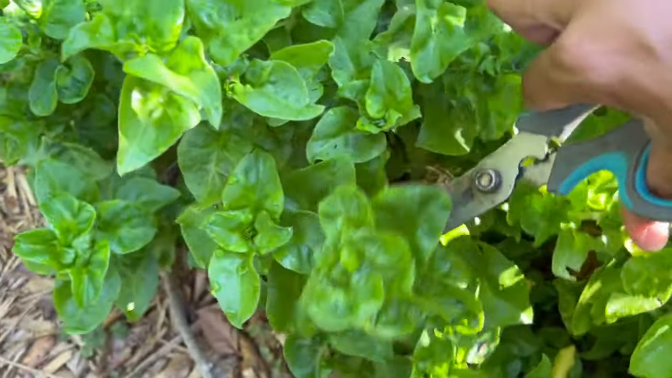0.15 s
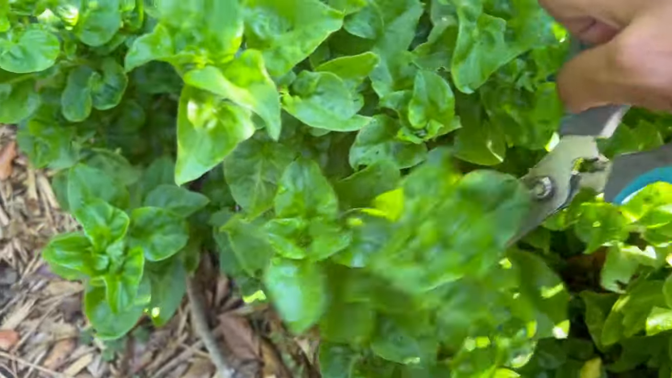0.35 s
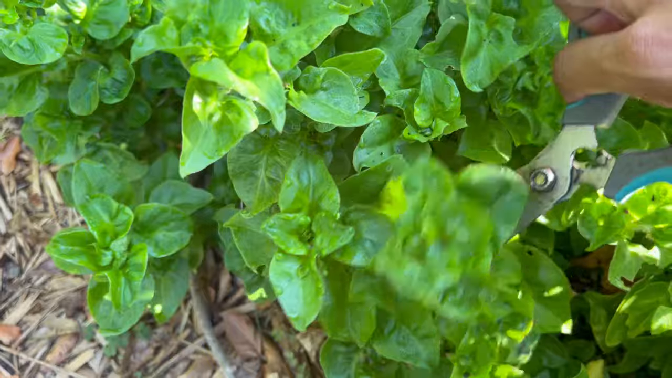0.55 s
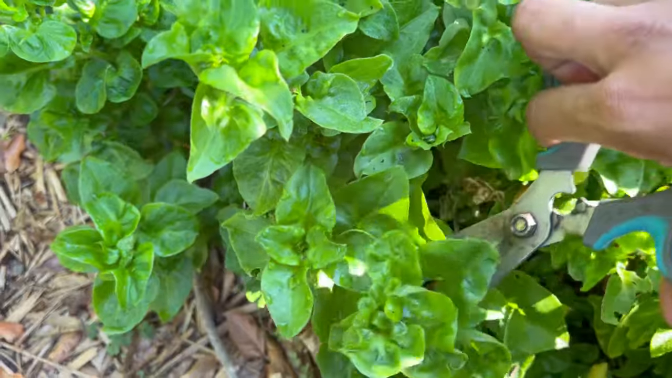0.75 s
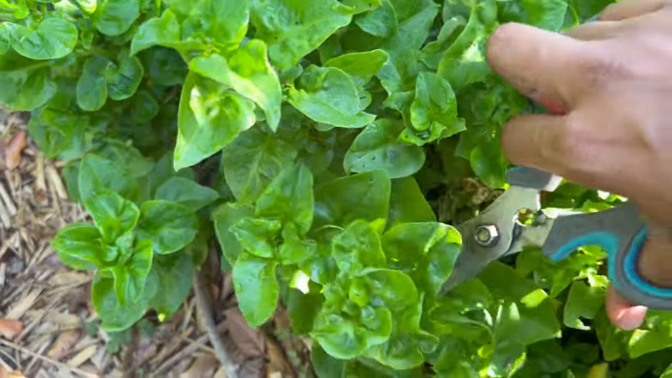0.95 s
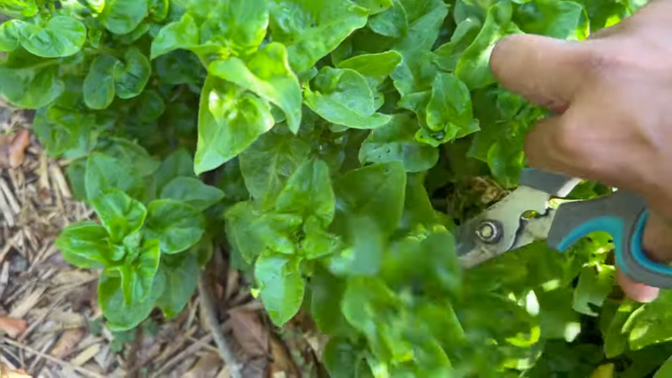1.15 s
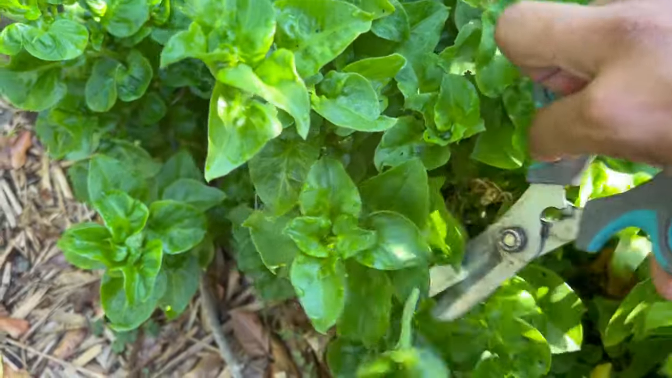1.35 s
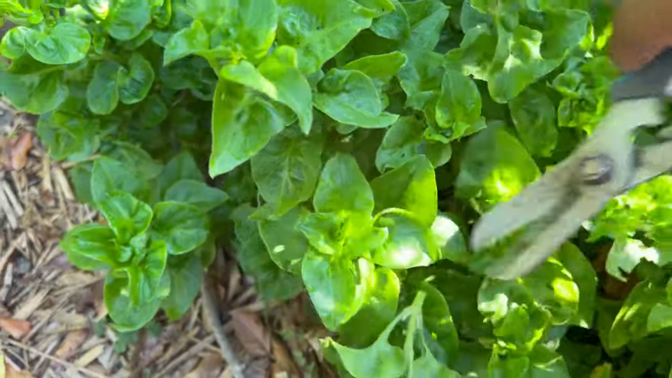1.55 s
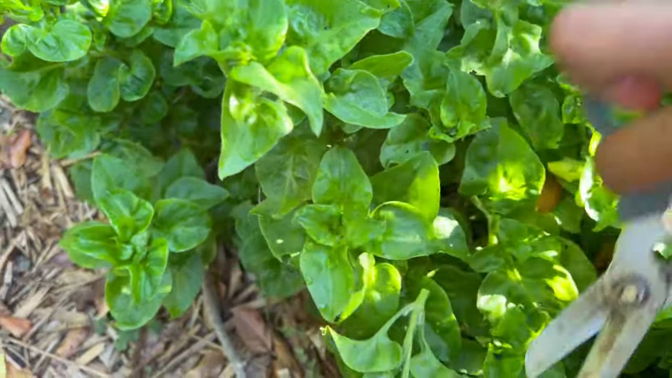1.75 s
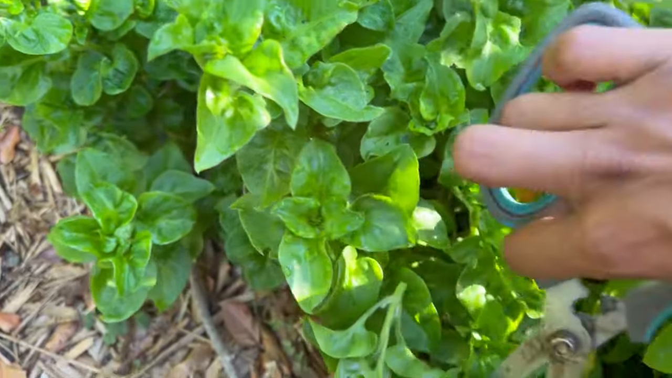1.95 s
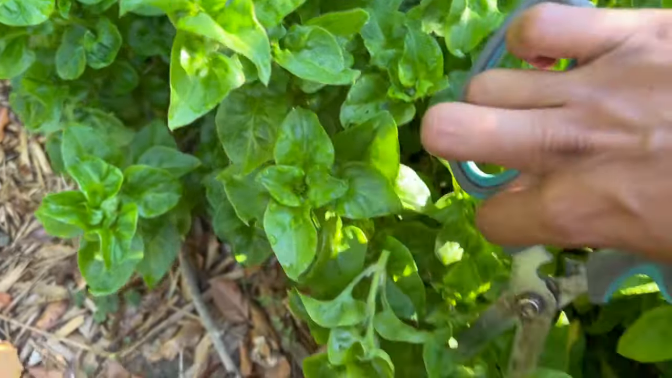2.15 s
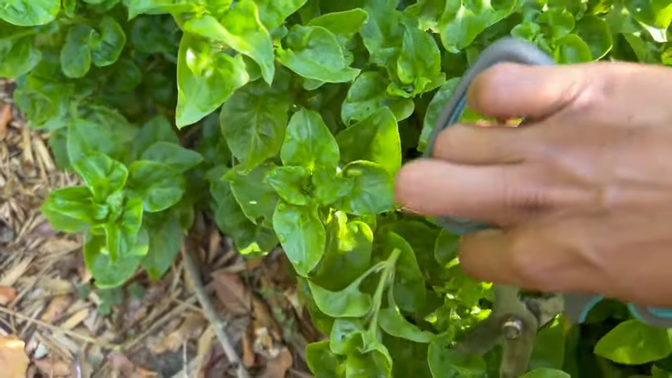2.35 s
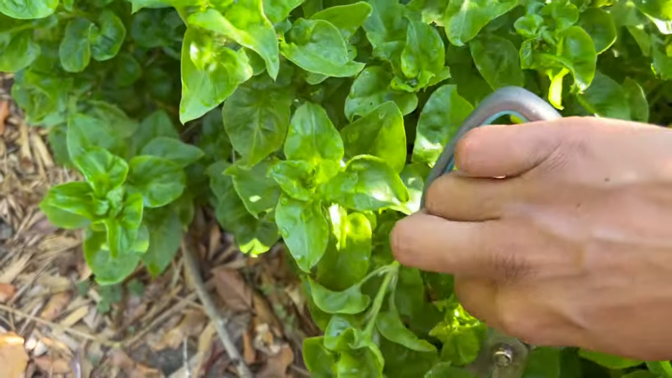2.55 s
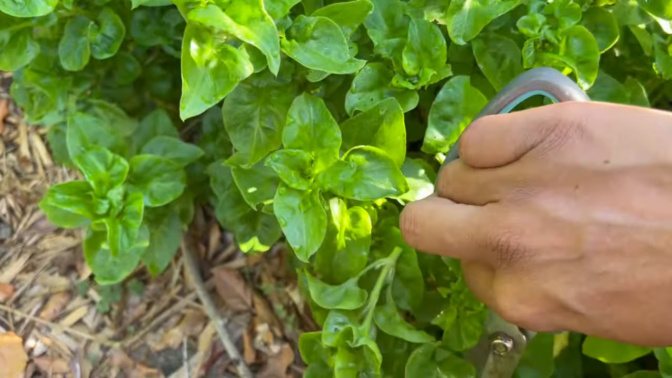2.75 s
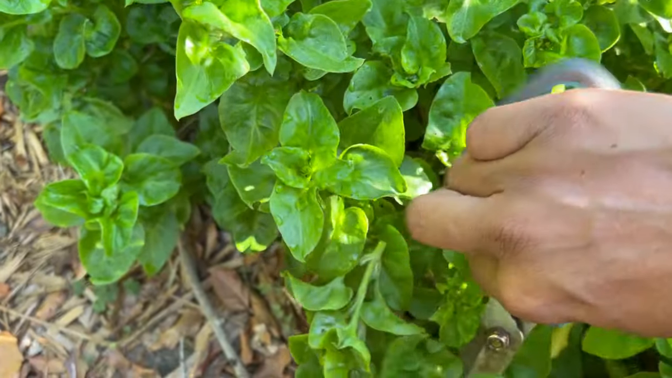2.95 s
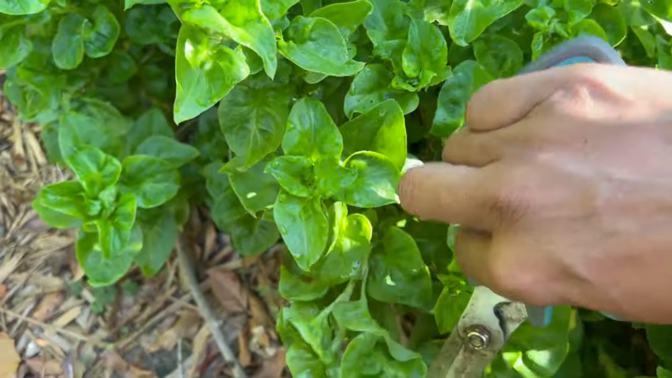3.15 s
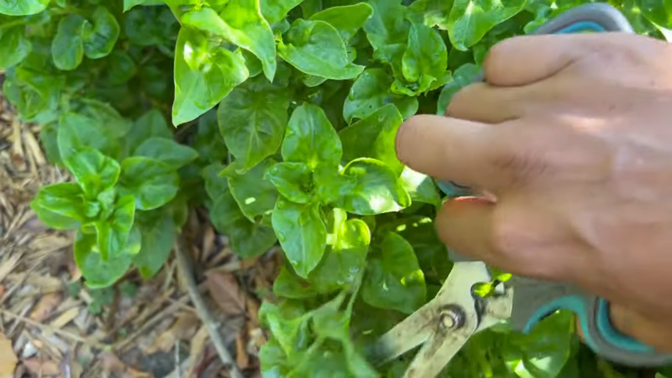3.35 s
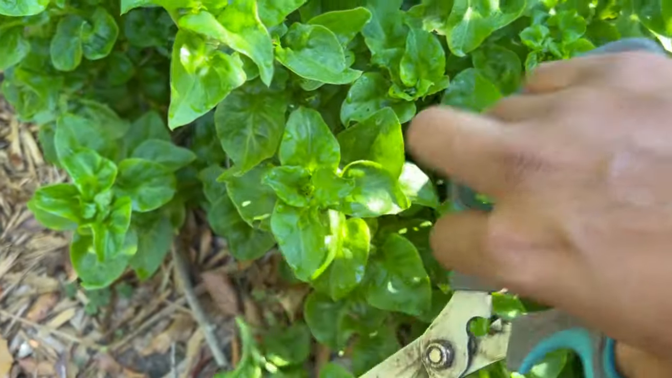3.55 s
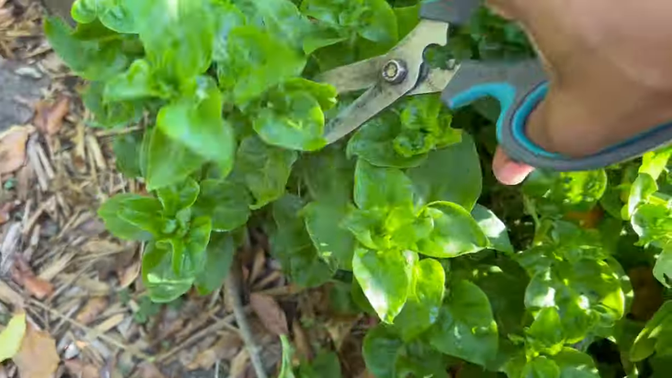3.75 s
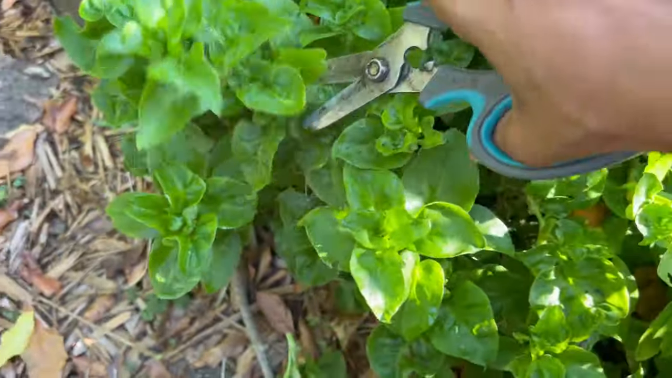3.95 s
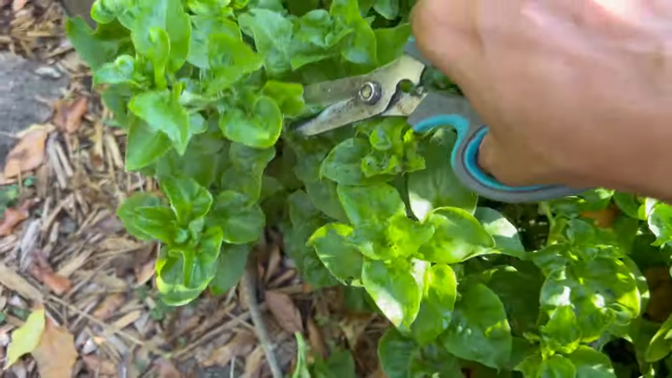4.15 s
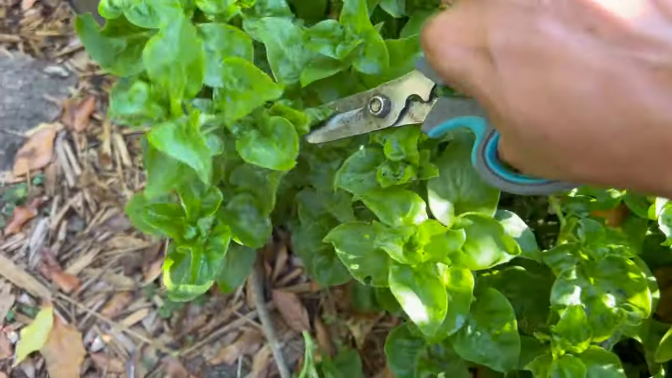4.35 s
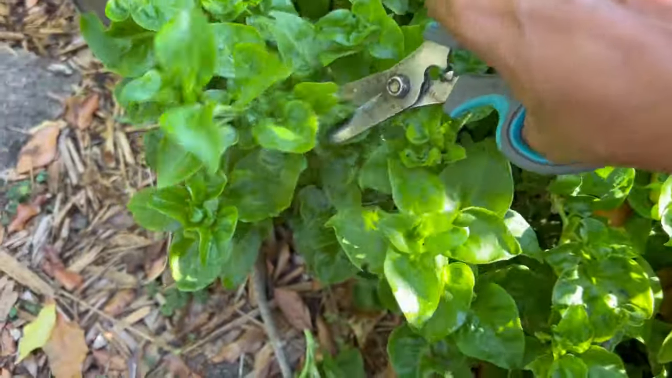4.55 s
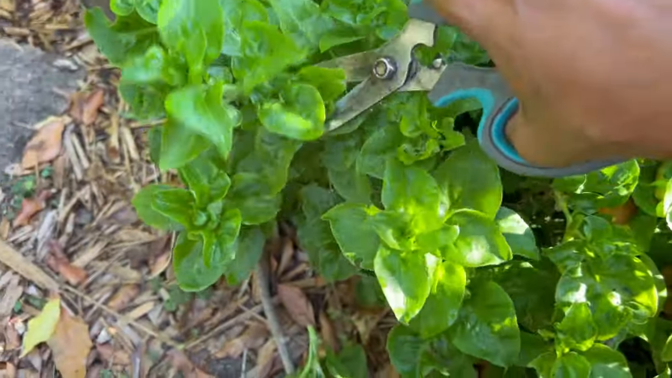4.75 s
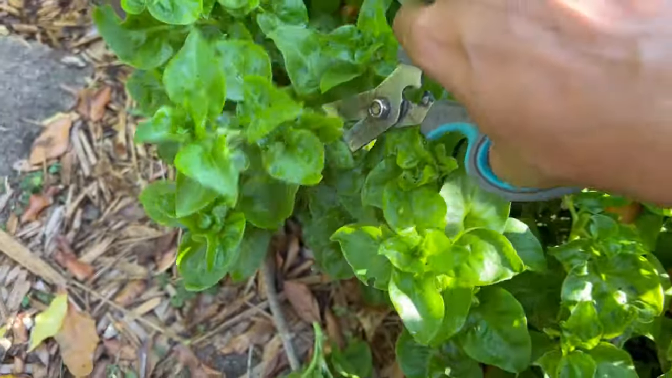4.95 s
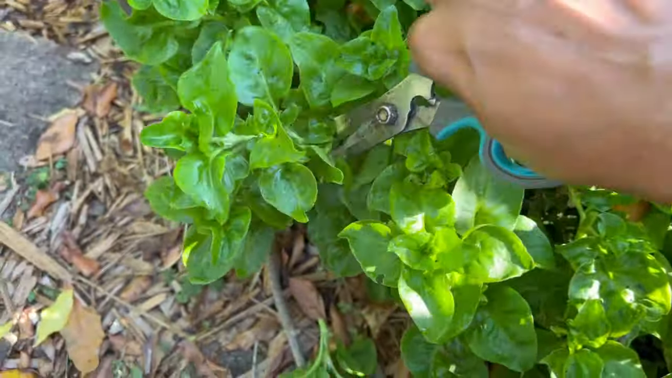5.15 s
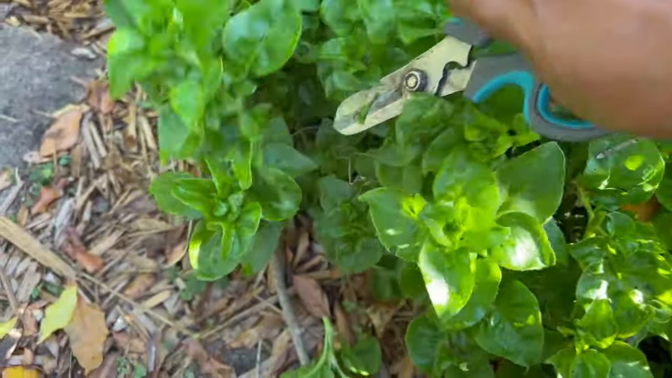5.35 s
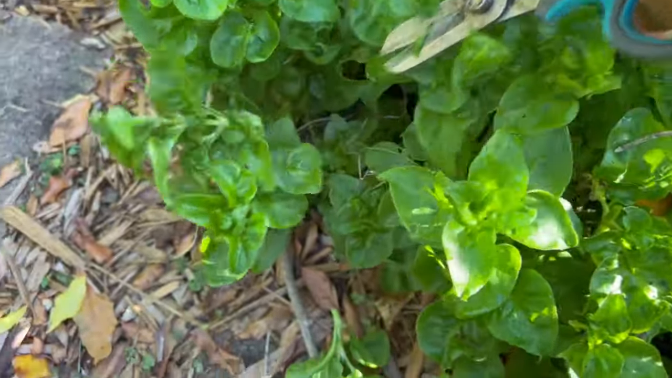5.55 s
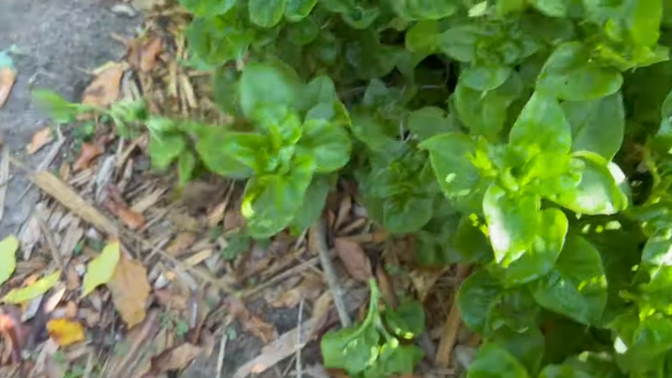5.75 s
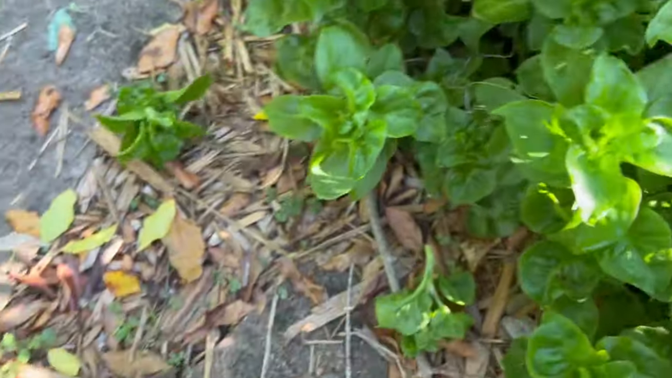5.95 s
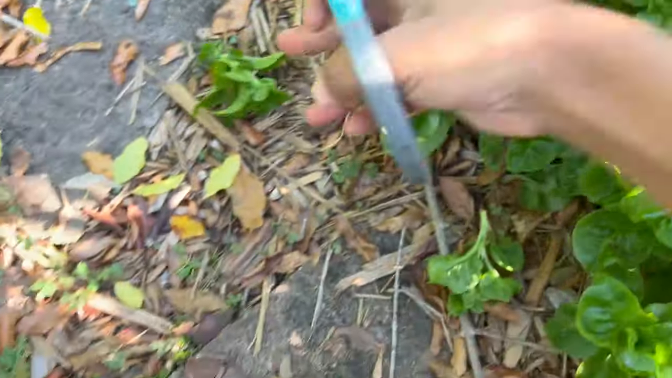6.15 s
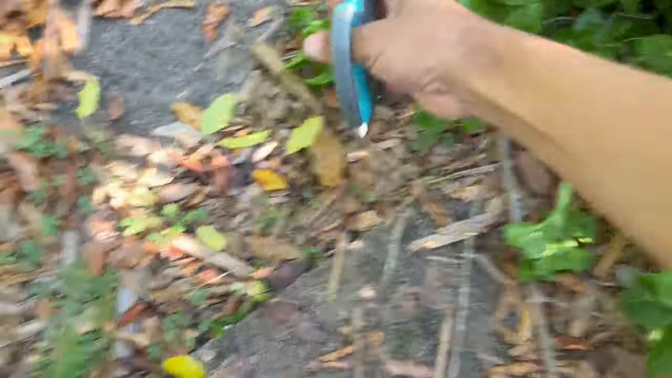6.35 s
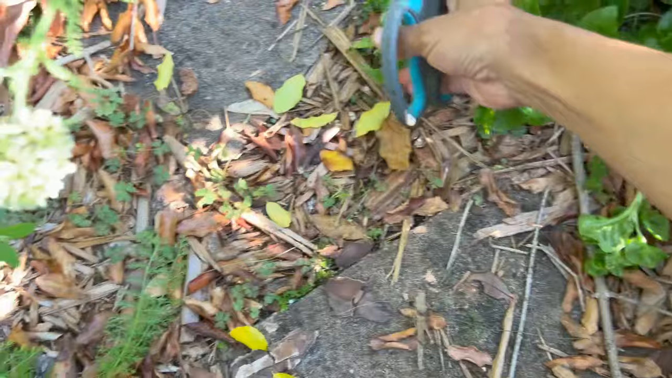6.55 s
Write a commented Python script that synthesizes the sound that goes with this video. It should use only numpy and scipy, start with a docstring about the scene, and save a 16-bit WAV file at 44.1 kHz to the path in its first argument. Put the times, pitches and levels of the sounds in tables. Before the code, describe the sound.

Crisp, close snips of garden shears cut juicy stems amid brushing leaves, over a low rumble, faint insects and a small chirping bird.

```python
"""Hand shears in a garden

Shears snip juicy stems close to a two-port microphone: fibres tear in noise bursts that ring the blades, hard
cuts snap them shut, and leaves rustle. Behind lie a low rumble, an insect chorus, far hiss, a small bird's
echoing chips and faint far tones. One chip and its echoes stop abruptly just as a low click sounds; two soft
bumps come late. The loudest snips clip and make the gain control duck the background."""
import sys
import numpy as np
from scipy import signal
from scipy.fft import rfft, irfft, next_fast_len
from scipy.io import wavfile
from scipy.ndimage import uniform_filter1d, map_coordinates

SR = 44100
rng = np.random.default_rng(int(sys.argv[2]) if len(sys.argv) > 2 else 0)


def inscribe(sig):
    """Save sig as 16-bit PCM at rate SR to the path in sys.argv[1].

    A 1-D sig is mono; a 2-D sig holds one channel per row.
    Samples are clipped to [-1, 1] before scaling.
    """
    pcm = np.round(np.clip(np.atleast_2d(sig).T, -1, 1) * 32767)
    wavfile.write(sys.argv[1], SR, pcm.astype(np.int16))


N = 291942
TREBLE_LAG, BODY_LAG = 12, 4  # delay between the ports [samples]


def amp(db):
    """Decibels as an amplitude ratio."""
    return 10 ** (np.asarray(db) / 20)


def unit(x):
    """Normalisation to rms 1."""
    return x / np.sqrt(np.mean(x ** 2) + 1e-20)


def along(points, hz):
    """Interpolation of (frequency, value) points on a logarithmic axis."""
    knots_hz, values = np.transpose(points)
    return np.interp(np.log(hz + 1), np.log(knots_hz + 1), values)


def curves(rows):
    """Linear interpolation: one value per sample for each column after the time."""
    times, *columns = np.transpose(rows)
    return [np.interp(np.arange(N) / SR, times, column) for column in columns]


def wobble(rate):
    """Random modulation: a spline through rate Gaussian knots a second."""
    return map_coordinates(rng.standard_normal(int(N * rate / SR) + 4), [np.arange(N) * rate / SR])


def filtered(x, response):
    """Zero-phase filtering by a gain that depends on frequency."""
    size = next_fast_len(N + SR // 2)
    return irfft(rfft(x, size) * response(np.fft.rfftfreq(size, 1 / SR)), size)[..., :N]


def coloured(x, spectrum):
    """Minimum-phase filtering with power gain 1: resonances ring only after their excitation."""
    cepstrum = irfft(np.log(amp(along(spectrum, np.fft.rfftfreq(4096, 1 / SR))) + 1e-5))
    cepstrum[1:2048] *= 2
    cepstrum[2049:] = 0
    impulse = irfft(np.exp(rfft(cepstrum)))
    return signal.fftconvolve(x, impulse[None] / np.linalg.norm(impulse), axes=1)[:, :N]


def diffuse(spectrum):
    """A diffuse noise field of rms 1: the ports are coherent only at long wavelengths."""
    # likeness of left and right: (frequency [Hz], correlation [ratio])
    coherence = [(60, 1), (180, 0.91), (550, 0.16), (1650, 0.23), (4970, 0.039), (15000, 0.03)]

    def mid_side_gain(hz):
        angle = np.arccos(np.clip(along(coherence, hz), -1, 1)) / 2
        return amp(along(spectrum, hz)) * [np.cos(angle), np.sin(angle)]

    mid, side = filtered(rng.standard_normal((2, N)), mid_side_gain)
    return unit(np.array([mid + side, mid - side]))


def near(own, lag):
    """Path difference: noise reaches the right port lag samples early; own is the incoherent share."""
    shared = rng.standard_normal(N + lag)
    coherent = np.array([shared[:N], shared[lag:]])
    return np.sqrt(1 - own) * coherent + np.sqrt(own) * rng.standard_normal((2, N))


def foliage(x, t60, build_s):
    """Scattering: echoes merge into an exponentially decaying noise tail at each port."""
    t = np.arange(SR // 2) / SR
    tail = rng.standard_normal((2, len(t))) * amp(-60 * t / t60) * (1 - np.exp(-t / build_s))
    return signal.fftconvolve(x, tail / np.linalg.norm(tail[0]), axes=1)[:, :N]


def rumble():
    """Band-limited noise: two broad low bands, and one so narrow that it is a far motor's note."""
    # drift of the broad bands: (time [s], deep level [dB], drone level [dB])
    levels = [(0.0, -50.5, -45), (0.9, -41.5, -42.5), (1.4, -42, -39), (2.25, -39.5, -38.5),
              (2.8, -43, -42.5), (3.1, -41.5, -40), (3.87, -41.5, -36.5), (4.85, -43, -34),
              (5.35, -47.5, -37), (5.8, -37.5, -38), (6.62, -44, -40.5)]
    # spectra of the deep band, the drone and the motor: (frequency [Hz], relative density [dB])
    deep = [(15, -55), (28, -25.5), (40, -12.5), (52, 4), (70, -4), (85, -9), (110, -29.5), (190, -120)]
    drone = [(41, -33), (70, -5.5), (86, 0), (100, -2), (118, -9), (147, -12), (204, -22.5), (247, -26.5),
             (312, -40.5), (400, -37), (520, -81), (880, -120)]
    motor = [(80, -65), (89, -23), (92, -1.5), (95, -13), (105, -67.5)]
    deep_db, drone_db = curves(levels)
    lowest = amp(deep_db) * diffuse(deep)
    droning = diffuse(drone) + amp(-8.5 + 5.7 * wobble(0.75)) * diffuse(motor)
    return lowest + amp(drone_db) * droning


def insects():
    """Incoherent summation: many insects merge into a fluttering noise band near 5.7 kHz."""
    # strength of the chorus: (time [s], level [dB])
    levels = [(0.0, -59.5), (0.96, -57.5), (1.86, -54), (2.8, -55), (3.1, -51), (4.02, -54.5), (4.2, -47.5),
              (4.31, -52.5), (5.6, -54.5), (6.62, -56)]
    # spectrum of the chorus: (frequency [Hz], relative density [dB])
    spectrum = [(2760, -51.5), (4700, -18), (5010, -11), (5210, -2), (5480, 1.5), (5770, 4.5), (5970, -1),
                (6300, -17), (6500, -15), (8450, -35.5), (14300, -120)]
    return amp(curves(levels)[0] + 1.5 * wobble(60)) * diffuse(spectrum)


def garden_hiss():
    """Ambient noise: the far garden is a faint, slightly wavering diffuse field."""
    # spectrum of the hiss: (frequency [Hz], relative density [dB])
    spectrum = [(150, -35), (250, -13), (441, -21.5), (733, -17), (1120, -20), (4500, -31), (5850, -66.5),
                (9900, -120)]
    return amp(-63.0 + 0.66 * wobble(3.1)) * diffuse(spectrum)


def sweeps():
    """Power summation of strokes that swell and fade exponentially: the crisp and brush gains."""
    # hand or blades sweep through leaves or squeeze a stem:
    # (peak time [s], rise [s], fall [s], crisp level [dB], brush level [dB])
    strokes = [(0.191, 0.36, 0.13, -55.5, -59.5), (0.357, 0.069, 0.14, -57.5, -56),
               (0.656, 0.067, 0.14, -55.5, -55), (0.825, .05, 0.4, -54.5, -57),
               (1.121, 0.066, 0.37, -44.5, -47.5), (1.299, 0.024, 0.035, -47, -53),
               (1.416, 0.099, 0.13, -38, -43.5), (1.819, 0.014, .03, -48.5, -54.5),
               (2.093, .015, 0.016, -48.5, -48), (2.946, .004, .04, -41, -54),
               (2.017, 0.15, 0.94, -58.5, -58.5), (2.549, 0.084, 0.17, -51.5, -59),
               (2.774, 0.24, 0.33, -59.5, -64.5), (2.896, 0.036, 0.029, -41.5, -53),
               (2.98, 0.025, 0.035, -19, -37.5), (3.032, 0.073, 0.4, -48, -51),
               (3.42, 0.086, 0.059, -40.5, -46.5), (3.513, 0.082, 0.25, -38.5, -47),
               (3.988, 0.042, 0.28, -48.5, -56.5), (4.183, 0.02, 0.14, -41.5, -74),
               (4.313, 0.12, 0.092, -32.5, -50), (4.619, 0.072, 0.12, -39, -48),
               (4.912, 0.048, 0.12, -54, -58.5), (5.131, 0.096, 0.065, -40, -52.5),
               (5.298, 0.029, 0.22, -37, -49), (5.48, 0.078, 0.067, -46.5, -50.5),
               (5.552, 0.11, 0.36, -47, -56), (5.725, 0.2, 0.43, -46, -52.5),
               (5.73, 0.022, 0.015, -47, -52), (6.28, 0.13, 0.29, -50, -53),
               (6.519, 0.021, 0.05, -44.5, -50.5)]
    crisp_fade_db, brush_fade_db = 21.5, 12.5  # drop one rise before or one fall after the peak
    t = np.arange(0, N / SR + .002, .001)
    power = np.zeros((2, len(t)))
    for peak, rise, fall, crisp_db, brush_db in strokes:
        away = np.where(t < peak, (peak - t) / rise, (t - peak) / fall)
        power += amp([crisp_db - crisp_fade_db * away, brush_db - brush_fade_db * away]) ** 2
    return curves(np.c_[t, np.sqrt(power.T)])


def patchy(x, depth_db):
    """Random gain over time and frequency gives each leaf its own colour."""
    frames = signal.stft(x, nperseg=256)[2]
    field = uniform_filter1d(rng.standard_normal(frames.shape[1:]), size=9, axis=0)
    field = uniform_filter1d(field, size=4, axis=1)
    mottled = signal.istft(frames * amp(depth_db * unit(field)), nperseg=256)[1][:, :N]
    return mottled / np.percentile(np.abs(mottled), 62)  # the usual level between ticks is 1


def leaves():
    """Friction noise: leaves brush hand and blades, in clumps of tiny ticks over a soft scrape."""
    # spectra of the ticks and of the scrape: (frequency [Hz], relative density [dB])
    tick_spectrum = [(1760, -23), (3000, -9), (3400, -11), (4870, -8.5), (5770, -3), (7130, -6), (7750, -4),
                     (9050, -4), (10100, -20.5), (11600, -8.5), (12900, -16), (13800, -31.5), (15000, -5.5),
                     (16100, -23)]
    scrape_spectrum = [(150, -38), (250, -3), (445, -1), (854, 3), (956, -4.5), (1410, 0.5), (1880, 0),
                       (2540, -2.5), (5000, -13.5), (6500, -22), (11000, -120)]
    crisp_gain, brush_gain = sweeps()
    clumps_db = 2.4 * wobble(35) + 3.42 * wobble(160)
    snaps_db = 11 * (wobble(500) > 2.3)  # now and then a dry edge snaps
    crisp_db = clumps_db + 0.54 * wobble(1400) + snaps_db
    crisp = patchy(amp(crisp_db) * near(own=1.0, lag=TREBLE_LAG), depth_db=3.5)
    brush_db = 0.42 * clumps_db + 2.4 * wobble(300) + snaps_db / 3
    brush = patchy(amp(brush_db) * near(own=0.67, lag=BODY_LAG), depth_db=2.5)
    return coloured(crisp_gain * crisp, tick_spectrum) + coloured(brush_gain * brush, scrape_spectrum)


def bird(cut_s):
    """Fast upward chirps, heard mostly as reverberation from trees; echoes ringing at cut_s stop."""
    # the bird's calls: (time [s], level [dB], left minus right [dB])
    chips = [(0.461, -28.5, 1.5), (1.441, -25.5, 1), (2.414, -32.5, 3), (2.75, -27.5, 2), (3.775, -23, 2),
             (4.0443, -24.5, 1), (6.487, -38, 1), (6.543, -25.5, 1)]
    t = np.arange(int(.012 * SR)) / SR
    progress = t / t[-1]
    sweep_hz = 5500 + 2600 * np.sin(np.pi / 2 * progress)
    envelope = np.sin(np.pi * progress) ** .5 * amp(-9 * progress)
    chip = envelope * np.sin(2 * np.pi * np.cumsum(sweep_hz) / SR)
    before, after = np.zeros((2, 2, N))
    for time, db, pan_db in chips:
        track = after if time > cut_s else before
        track[:, round((time - .003) * SR):][:, :len(t)] += chip * amp([[db + pan_db / 2],
                                                                        [db - pan_db / 2]])

    def among_trees(x):
        early = amp(3.5) * foliage(x, t60=0.34, build_s=0.0014)
        late = amp(-12.5) * foliage(x, t60=1.0, build_s=0.046)
        return amp(-8.5) * x + early + late

    return among_trees(before) * (np.arange(N) < cut_s * SR) + among_trees(after)


def far_tones():
    """A perfect fifth: two faint sines in the ratio 3:2 come and go together."""
    # soundings of the pair: (time [s], duration [s], level of the lower tone [dB])
    notes = [(0.49, 0.27, -66), (1.2, 0.585, -65), (3.154, 0.28, -60.5), (3.96, 0.56, -64.5),
             (4.81, 0.31, -64), (5.703, 0.64, -63.5), (6.398, 0.32, -69.5)]
    t = np.arange(N) / SR
    envelope = sum(amp(db) * np.clip(np.minimum(t - start, start + length - t) / 0.024, 0, 1)
                   for start, length, db in notes)
    phase = 2 * np.pi * 496 * t
    return envelope * (np.sin(phase) + amp(-5) * np.sin(phase * 3 / 2))


def fracture(t, hardness, break_s):
    """Stress release as an envelope: the stem breaks at t = 0, then stray fibres part."""
    crunch = hardness * amp(-29 + 60 * t / 0.064)  # a hard cut squeezes the stem first
    lead_in = amp(-14.0 + 60 * t / 0.0044)  # a brief faint swell leads into the crack
    t60 = 0.0085 - 0.0027 * hardness
    snap = amp(-5.0 * t / break_s - 60 * np.maximum(t - break_s, 0) / t60)
    spike = 1 + np.sqrt(hardness) * amp(6) * np.exp(-np.abs(t) / .0004)
    strays = amp(-13.5 - 60 * t / 0.041)
    return np.where(t < 0, lead_in + crunch, snap * spike + strays)


def shears():
    """Impulsive excitation: tearing fibres ring blades and stem; hard cuts ring the handles too."""
    # cracks of stem and blade: (time [s], level [dB], body level under 3 kHz [dB re crack],
    # spit level over 10 kHz [dB re crack], ring frequency [Hz])
    cracks = [(0.607, -51.5, 3, -13, 5500), (0.653, -31, -7.5, -33, 5600), (0.6944, -51, 2.5, -24, 5000),
              (0.915, -43.5, 3.5, -14, 4930), (1.0326, -21.5, -11, -24, 5720),
              (1.0742, -11.5, -19, -15, 6050), (1.097, -19, -13, -11.5, 6700),
              (1.0995, -12, -15, -25.5, 5690), (1.1095, -31, -4, -34.5, 5910),
              (1.116, -31.5, -13, -23, 6460), (1.121, -15.5, -12, -16, 5750),
              (1.1229, -6.5, -13, -5.5, 7390), (1.1286, 6.5, -16.5, -18.5, 5470),
              (1.251, -15, -14, -9.5, 6570), (1.2848, -14.5, -26, -9.5, 6100),
              (1.294, -10.5, -21, -14.5, 9100), (1.3155, -25, -11, -8, 6500),
              (1.3202, -24.5, -13, -7, 6450), (1.3478, -17.5, -27, -21, 6000),
              (1.4125, -21, -9.5, -7, 6630), (1.5187, -28, -20, -26.5, 4700),
              (1.5845, -18.5, -27, -39.5, 3040), (1.5938, -18.5, -28, -19, 7900),
              (1.5944, -22.5, -23, -32, 3130), (1.627, -37, -5, -20, 4500), (2.002, -39, -14, -7, 8000),
              (2.8356, -12.5, -11, -10.5, 5875), (2.892, -24.5, -9.5, -5.5, 5890),
              (2.917, -36, -19.5, -1.5, 7000), (2.956, -30, -7, -5.5, 6500), (2.9721, -9, -17, -19, 6070),
              (2.9793, 6.5, -18.5, -20.5, 6190), (2.9878, -9, -18, -17.5, 6020),
              (2.992, -15, -35, -8.5, 9000), (3.5595, -21, -14, -25, 7100),
              (3.5677, -16.5, -17.5, -13, 6770), (3.615, -38, -6, -24, 4980),
              (3.7164, -14.5, -51, -6.5, 7870), (4.172, -17.5, -37, -18, 7240),
              (4.1763, -12, -39, -5.5, 7040), (4.1848, -13, -19, -25, 5550),
              (4.2152, -24.5, -45.5, 1, 7300), (4.231, -12, -35.5, -11.5, 7270),
              (4.2472, -22, -28, -7, 8200), (4.257, -22, -19, -3.5, 7900), (4.2763, -25.5, -14, -4, 7900),
              (4.282, -26, -25.5, -3.5, 8260), (4.301, -26, -23, -8.5, 7800), (4.308, -25.5, -25, -4, 8200),
              (4.291, -22.5, -24.5, -16.5, 7700), (4.2942, -17.5, -28.5, -18, 7320),
              (4.3183, -19, -19, -16.5, 8290), (4.3256, -2, -11.5, -23.5, 5140),
              (4.619, -24, -12, -28, 4530), (5.061, -33.5, -12, -13, 6500), (5.069, -33, -10, -0.5, 8400),
              (5.0824, -14.5, -27, -8, 9400), (5.1024, -28.5, -33, 5.5, 7850),
              (5.1317, -26.5, -32, -9, 8000), (5.139, -13.5, -8.5, -12, 6000),
              (5.1511, -24.5, -10.5, -13, 5460), (5.271, -21.5, -15, -8, 8000),
              (5.2765, -15.5, -9, -15, 5900), (5.2797, -10, -13, -6.5, 5470),
              (5.2842, 10.5, -18.5, -23.5, 6300), (5.536, -28, -28, -28, 5370),
              (5.563, -27.5, -13, -24, 4730), (5.667, -37, -21, -20, 4500), (5.788, -34.5, -6, -16, 6500),
              (5.831, -36, -5, -22, 4500), (5.903, -36.5, -3, -21, 5000), (6.2221, -28, -22, -1.5, 5270),
              (6.284, -28, -29, -1, 6000), (6.515, -35, -12, -14, 6000)]
    # spectra of the sounding parts: (frequency [Hz], relative density [dB])
    blade_spectrum = [(1760, -31.5), (3000, -14.5), (3920, -22), (4880, -2.5), (6670, -3.5), (7270, -18),
                      (8020, -2), (9070, 2), (10200, -12), (13300, -33), (22000, -120)]
    cell_spectrum = [(6120, -38.5), (10400, -16.5), (11700, 5.5), (12100, -4), (12700, 3.5), (13600, -30.5),
                     (15200, -1.5), (16100, -10)]  # bursting cells
    body_spectrum = [(88, -45), (150, -24), (310, -18.5), (591, -6), (950, -11.5), (1150, -14), (1450, 2),
                     (1750, 1), (2070, -1.5), (2330, 2), (2620, -6), (3500, -15.5), (4550, -51.5),
                     (7700, -120)]  # stem and handles under a hard cut
    pulp_spectrum = [(100, -22.5), (300, -12), (900, -11), (1400, -0.5), (2000, -5), (2800, -0.5),
                     (3800, -10), (5500, -34), (9000, -120)]  # stem alone under a light crack
    shut_db = -6  # louder cracks shut the blades and ring the handles
    knock_db, knock_s = -5, 0.0012  # push of the meeting handles: level re body, half-width
    lead = round(.04 * SR)
    t = (np.arange(SR // 8) - lead) / SR - .001
    fibres = amp(2.5 * wobble(1500))  # fibres part unevenly
    tearing = [fibres * near(own=.4, lag=TREBLE_LAG), fibres * near(own=.12, lag=TREBLE_LAG),
               near(own=.35, lag=BODY_LAG)]
    blades, cells, body, pulp, rings = np.zeros((5, 2, N))
    for time, db, body_db, spit_db, ring_hz in cracks:
        hardness = min(amp(db), 1) ** 2
        break_s = 0.0009 + 0.0022 * hardness
        envelope = amp(db) * fracture(t, hardness, break_s)
        start = round(time * SR) - lead
        now = slice(start, start + len(t))
        bursts = np.array([envelope * noise[:, now] for noise in tearing])
        # chance shapes a burst but does not set its energy
        edge, spit, push = bursts * np.linalg.norm(envelope) / np.linalg.norm(bursts, axis=2)[..., None]
        blades[:, now] += amp(-9.5) * edge * min(ring_hz / 5500, 1) ** 2  # a thick spot is duller
        spot = signal.iirpeak(ring_hz, Q=3, fs=SR)  # the breaking spot has its own resonance
        rings[:, now] += amp(1.0) * signal.lfilter(*spot, signal.lfilter(*spot, edge))
        cells[:, now] += amp(spit_db) * spit
        knock = hardness * amp(db + body_db + knock_db) * np.exp(-((t - break_s) / knock_s) ** 2)
        struck = body if db > shut_db else pulp
        struck[:, now] += amp(body_db) * push + knock
    bright = coloured(blades, blade_spectrum) + coloured(cells, cell_spectrum) + rings
    delayed_body = np.roll(body, round(0.00061 * SR), axis=1)
    dull = coloured(delayed_body, body_spectrum) + coloured(pulp, pulp_spectrum)
    return bright + dull + amp(-29) * foliage(bright, t60=.09, build_s=.003)


def low_click(time):
    """A step transient: a sudden jump sags back as a damped 55 Hz cosine."""
    click, t = np.zeros(N), np.arange(SR // 5) / SR
    click[round(time * SR):][:len(t)] = amp(-22.5 - 60 * t / 0.05) * np.cos(2 * np.pi * 55 * t)
    return click


def bumps():
    """Damped oscillation: low sines with a gentle onset sound as soft bumps."""
    # low pushes: (time [s], level [dB], frequency [Hz], time to decay 60 dB [s])
    pushes = [(6.429, -16.5, 111, 0.056), (6.521, -35, 68.7, 0.022)]
    track, t = np.zeros(N + SR), np.arange(SR // 5) / SR
    onset = 1 - np.exp(-(t / 0.0044) ** 2)
    for time, db, hz, t60 in pushes:
        track[round(time * SR):][:len(t)] += onset * amp(db - 60 * t / t60) * np.sin(2 * np.pi * hz * t)
    return track[:N]


def scene():
    """Superposition of the near and far sources at the two ports."""
    click_s = 3.7896
    close = shears() + leaves() + low_click(click_s) + bumps()
    return close + bird(cut_s=click_s) + far_tones() + rumble() + insects() + garden_hiss()


def record(dry):
    """Automatic gain control: peaks duck the gain, those too fast for it clip; a band limit follows."""
    # colour difference of the ports: (frequency [Hz], left minus right [dB])
    imbalance = [(60, -1.5), (150, 0.5), (380, -1.5), (950, 4), (2380, 2), (5980, 10), (10500, -3.3),
                 (15000, 2)]
    threshold_db, max_duck_db, recovery_db_per_s, attack_s = -12, 9, 6, 0.013
    ports = filtered(dry, lambda hz: amp(along(imbalance, hz) * [[.5], [-.5]]))
    level_db = 20 * np.log10(np.abs(ports).max(0) + 1e-9)
    demand_db = np.minimum(0.41 * (level_db - threshold_db), max_duck_db)
    climb_db = recovery_db_per_s * np.arange(N) / SR
    duck_db = np.maximum(np.maximum.accumulate(demand_db + climb_db) - climb_db, 0)
    pole = np.exp(-1 / (attack_s * SR))
    gain = amp(-signal.lfilter([1 - pole], [1, -pole], duck_db))

    def band_limit(hz):
        shelf = .04 + .96 * np.clip((16300 - hz) / 200, 0, 1)
        return shelf * np.clip((18800 - hz) / 200, 0, 1)

    return filtered(np.clip(ports * gain, -1, 1), band_limit)


dry = scene()
out = record(dry)
inscribe(out)
```